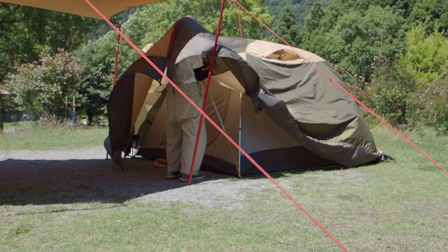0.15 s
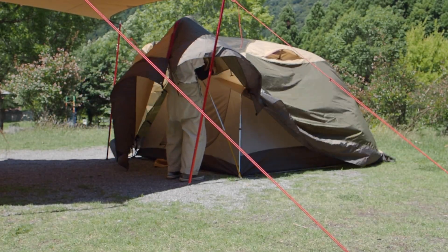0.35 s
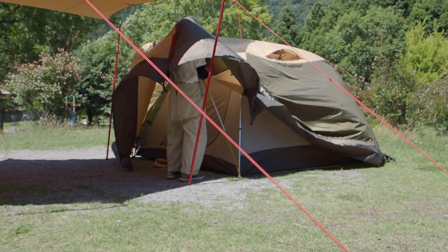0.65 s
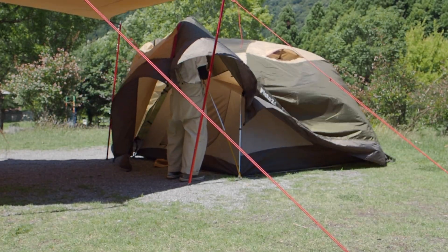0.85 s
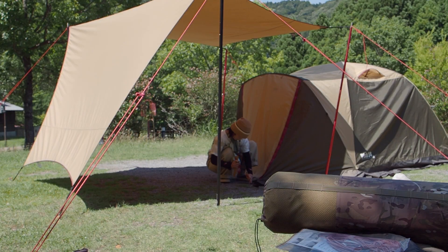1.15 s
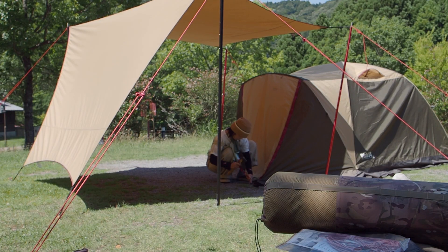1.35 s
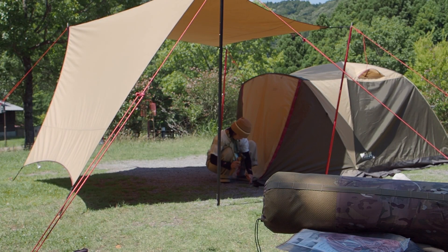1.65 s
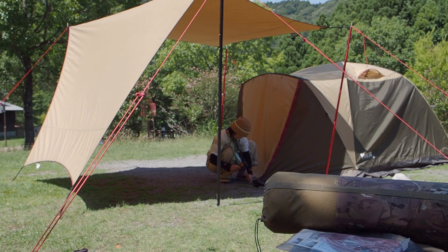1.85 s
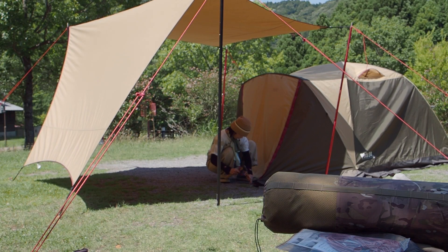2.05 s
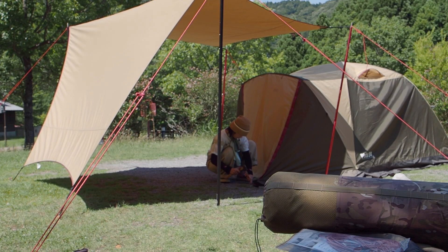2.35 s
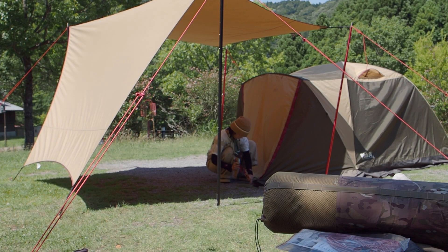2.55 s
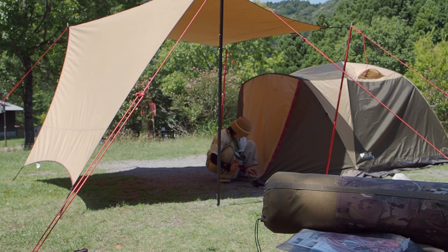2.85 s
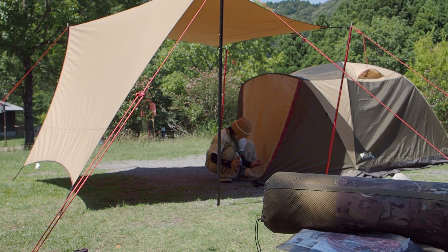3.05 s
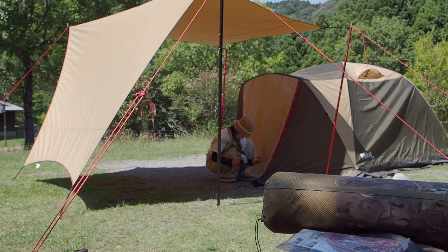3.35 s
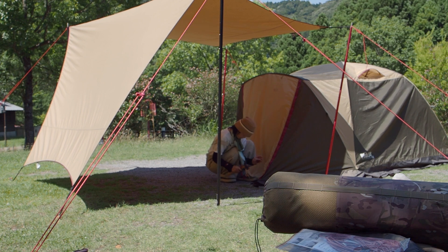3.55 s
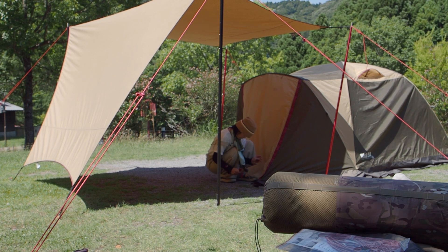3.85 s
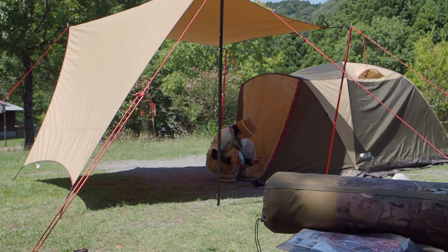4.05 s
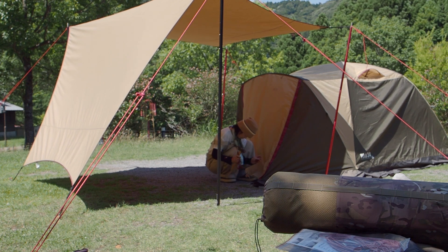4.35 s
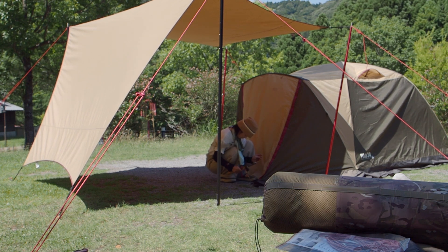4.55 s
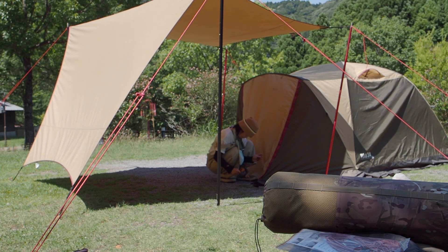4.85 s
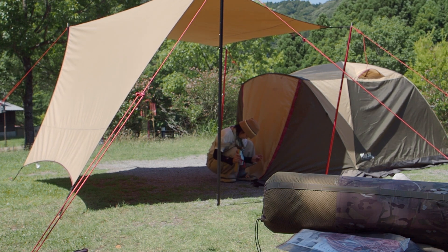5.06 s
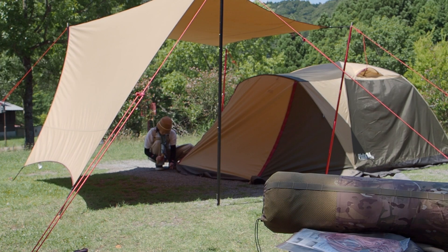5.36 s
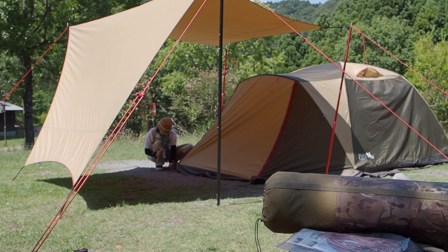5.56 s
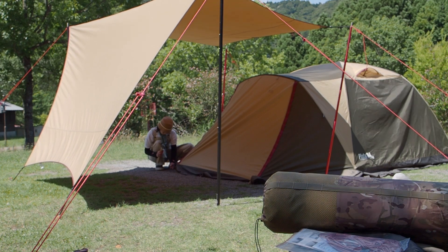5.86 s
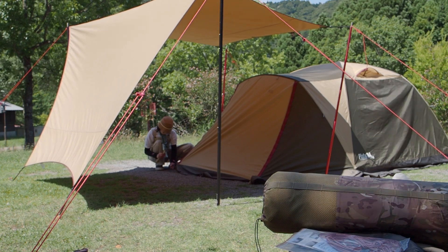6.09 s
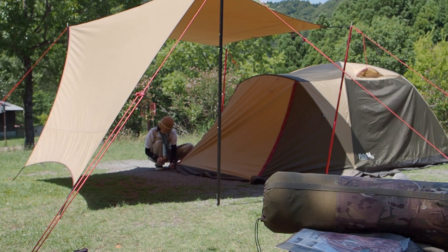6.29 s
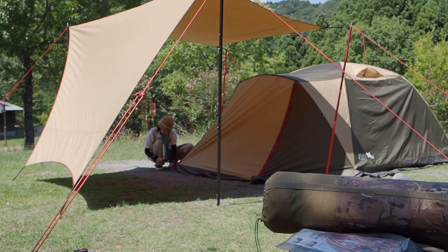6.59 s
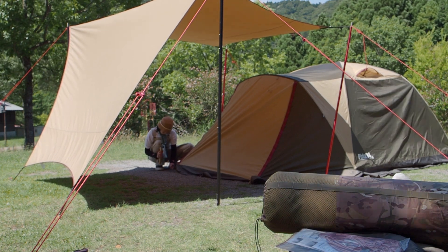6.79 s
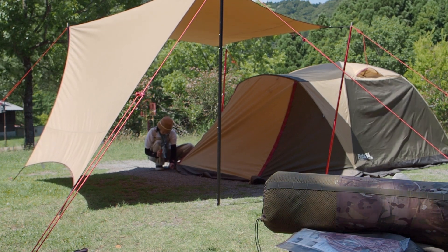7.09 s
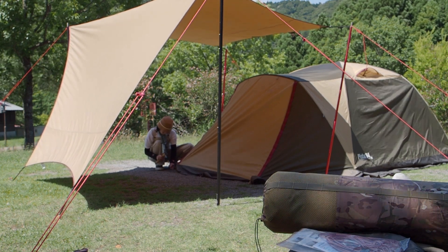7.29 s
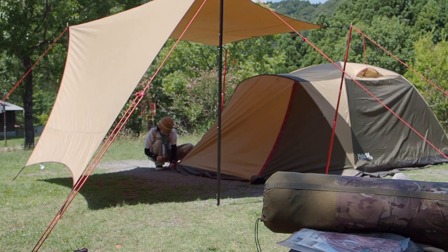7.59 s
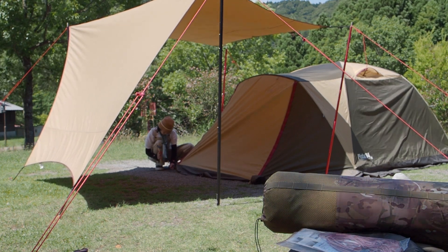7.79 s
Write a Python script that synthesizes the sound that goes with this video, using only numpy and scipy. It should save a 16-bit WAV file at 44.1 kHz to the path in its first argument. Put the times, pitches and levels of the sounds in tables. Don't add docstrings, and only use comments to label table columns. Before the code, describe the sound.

At an open grassy campsite, wind first buffets the microphone over faint leaf hiss. From one second a steel hammer strikes a metal tent peg about every 0.3 seconds, each blow a bright crack with a ringing clang and airy tail. A stiff bag crumples briefly near three seconds. After five seconds a second peg is struck, drier and shorter, with soft wind puffs. Stereo microphone some metres away.

```python
import sys
import numpy as np
from scipy import signal
from scipy.fft import rfft, irfft, next_fast_len
from scipy.io import wavfile
from scipy.ndimage import uniform_filter1d, map_coordinates

SR = 44100
rng = np.random.default_rng(int(sys.argv[2]) if len(sys.argv) > 2 else 0)


def level_to_linear(level):
    exponent = np.asarray(level, float) / 20
    return 10 ** exponent


def log_audio(samples):
    frames = np.atleast_2d(samples).T
    limited = np.clip(frames, -1, 1)
    pcm = np.round(limited * 32767).astype(np.int16)
    wavfile.write(sys.argv[1], SR, pcm)


N = 349713

# (start [s], far hum [dB], leaf hiss [dB], calm buffet [dB])
SHOTS = [
    (0, -49.5, -47, -64),
    (0.954, -52, -54, -64),
    (5.245, -52.5, -47, -72),
]
# (frequency [Hz], likeness [0-1])
ALIKE = [(60, 0.66), (180, 0.56), (550, 0.5), (1650, 0.36), (4970, 0), (15000, 0.05)]


def unit(x):
    return x / np.sqrt(np.mean(x ** 2) + 1e-20)


def along(points, hz):
    f, v = np.transpose(points)
    return np.interp(np.log(hz + 1), np.log(f + 1), v)


def sides(pan_db):
    return np.sqrt(2 / (1 + level_to_linear(np.outer([-1, 1], pan_db)) ** 2))


def add(out, s, sound):
    at = min(round(s * SR), N)
    out[:, at:at + sound.shape[-1]] += sound[..., :N - at]


def wobble(rate_hz):
    knots = rng.standard_normal((2, int(N * rate_hz / SR) + 4))
    return np.array([map_coordinates(k, [np.arange(N) * rate_hz / SR]) for k in knots])


def filtered(x, response):
    m = next_fast_len(x.shape[-1] + 8192)
    spectrum = rfft(x, m) * response(np.fft.rfftfreq(m, 1 / SR))
    return irfft(spectrum, m)[..., :x.shape[-1]]


def pulse(colour, size=1024):
    gain = level_to_linear(along(colour, np.fft.rfftfreq(size, 1 / SR)))
    cepstrum = irfft(np.log(gain + 1e-4))
    cepstrum[1:size // 2] *= 2
    cepstrum[size // 2 + 1:] = 0
    h = irfft(np.exp(rfft(cepstrum)))
    return h / np.abs(h).max()


def wavelet(hz, width_s, phase):
    half = round(4 * width_s * SR)
    t = np.arange(-half, half) / SR
    bell = np.exp(-.5 * (t / width_s) ** 2)
    wave = np.cos(2 * np.pi * hz * t + phase)
    return bell * (wave - np.sum(bell * wave, axis=-1, keepdims=True) / bell.sum())


def modes(table, t, attack_s, spread_db):
    out = np.zeros(len(t))
    for hz, db, t60 in table:
        decay = level_to_linear(db + spread_db * rng.normal() - 60 * t / t60)
        out += decay * np.sin(2 * np.pi * hz * t)
    return out * (1 - np.exp(-t / attack_s))


def rush(colour, alike, patchy_db):
    z = signal.stft(rng.standard_normal((2, N)), nperseg=512)[2]
    field = uniform_filter1d(rng.standard_normal(z.shape[1:]), size=6, axis=0)
    field = uniform_filter1d(field, size=14, axis=1)
    pair = signal.istft(z * level_to_linear(patchy_db * unit(field)), nperseg=512)[1][:, :N]

    def mid_side(hz):
        turn = np.arccos(np.clip(along(alike, hz), -1, 1)) / 2
        return level_to_linear(along(colour, hz)) * [np.cos(turn), np.sin(turn)]

    mid, side = filtered(pair, mid_side)
    return unit(np.array([mid + side, mid - side]))


def background_db():
    start, *levels = np.transpose(SHOTS)
    return np.array(levels)[:, np.searchsorted(start, np.arange(N) / SR, side="right") - 1]


def air():
    # (frequency [Hz], density [dB per Hz])
    hum_colour = [(15, -62), (25, -18), (108, -6.5), (256, -12.5), (286, -9), (399, -6.5), (665, -3.5),
                  (1060, -5), (1650, -6.5), (5000, -13.5), (6500, -38), (11000, -120)]
    # (frequency [Hz], density [dB per Hz])
    leaf_colour = [(880, -59), (1500, -4), (2080, -8.5), (3930, -7.5), (5120, 1.5), (8320, -1.5),
                   (15100, -12), (16100, -28), (16900, -84)]
    # (centre [s], width [s], level [dB])
    stirs = [
        (0.26, 0.041, 3),
        (0.874, 0.01, 0),
        (3.2, 0.16, 2.5),
        (6.05, .4, 1.2),
        (7.62, 0.032, -5.5),
        (7.55, 0.51, -1.5),
        (7.93, 0.062, 1.5),
    ]
    hum_db, hiss_db, _ = background_db()
    t = np.arange(N) / SR
    stir_db = 1.04 * wobble(2.86)[0]
    for s, width_s, db in stirs:
        stir_db += db * np.exp(-.5 * ((t - s) / width_s) ** 2)
    hum_follows = 0.82
    hum = level_to_linear(hum_db + hum_follows * stir_db + 3.5) * rush(hum_colour, ALIKE, patchy_db=1.48)
    return hum + level_to_linear(hiss_db + stir_db + 4.5) * rush(leaf_colour, ALIKE, patchy_db=0.5)


def gust_gain():
    # (start [s], hold [s], buffet [dB], left-right [dB])
    gusts = [(0.296, .24, -50.5, 24), (0.61, .13, -40, 18), (0.69, 0.067, -49, -20),
             (0.816, .13, -41.5, 16), (1.21, 0.057, -59, -6), (1.774, 0.028, -58, 2),
             (2.635, 0.037, -52, -16), (5.68, 0.033, -57, 11), (6.18, 0.017, -55, 12),
             (6.29, 0.027, -58, 3), (6.466, 1.5, -52, 1.5), (6.596, .05, -50.5, 4), (6.8, 0.13, -47, -4),
             (7.058, 0.023, -39.5, -11), (7.137, 0.11, -40.5, -2), (7.463, 0.074, -43, -1),
             (7.809, .13, -40.5, -4)]
    rise_db_per_s, fall_db_per_s, calm_swing_db, veer_db = 500, 203, 3.5, 8
    t = np.arange(N) / SR
    swing, veer = wobble(9)
    power = (level_to_linear(background_db()[2] + calm_swing_db * swing) * sides(veer_db * veer)) ** 2
    for s, hold_s, db, pan_db in gusts:
        before_s = np.clip(s - t, 0, None)
        after_s = np.clip(t - s - hold_s, 0, None)
        shape_db = -rise_db_per_s * before_s - fall_db_per_s * after_s
        same_shot = t < min([change for change, *_ in SHOTS if change > s] + [N])
        power += same_shot * (level_to_linear(db + shape_db) * sides(pan_db)) ** 2
    return np.sqrt(power)


def buffeting():
    # (frequency [Hz], density [dB per Hz])
    colour = [(12, -44), (20, -17), (81, 0), (166, -1.5), (264, -15), (476, -24.5), (558, -38),
              (900, -19.5), (1170, -41), (1980, -120)]
    lumpy = unit(level_to_linear(3.3 * wobble(35)) * rush(colour, [(30, .1)], patchy_db=1))
    return level_to_linear(2.5) * gust_gain() * lumpy


def air_lumps():
    # (time [s], peak [dB], frequency [Hz], left-right [dB])
    lumps = [(0.308, -38.5, 86, 29), (0.52, -39, 111, 19), (0.613, -32, 179, 33), (0.655, -27.5, 109, 26),
             (0.678, -25, 151, 23), (0.711, -33.5, 145, 21.0), (0.727, -34, 197, 24),
             (0.773, -37, 91.5, 12.0), (0.834, -25.5, 178, 30), (0.877, -33, 125, 14),
             (0.924, -38, 125, 14), (6.552, -46, 109, 16), (6.822, -47, 135, 0), (7.021, -48, 108, 10),
             (7.143, -38, 149, 1), (7.173, -36, 128, 6), (7.534, -42, 132, 7), (7.91, -44, 163, 12)]
    parts = [(1, 3, 0.0045), (2.4, -4, 0.0025), (4, -15.5, 0.0015)]  # (ratio, dB, width s)
    out = np.zeros((2, N))
    for s, db, hz, pan_db in lumps:
        phase = 2 * np.pi * rng.random((2, 1))
        for ratio, part_db, width_s in parts:
            burst = wavelet(ratio * hz, width_s, ratio * phase)
            add(out, s + 0.00826 - 4 * width_s, level_to_linear(db + part_db + 2.5) * sides(pan_db) * burst)
    return out


def shank(table, t):
    top_db = max(db for hz, db, t60 in table)
    shift = 1 + 0.0218 * rng.normal()
    shifted = [(hz * shift, db - top_db, t60) for hz, db, t60 in table]
    return modes(shifted, t, attack_s=0.0018, spread_db=4)


def scatter(colour, decay, t):
    hz, frames_s, z = signal.stft(rng.standard_normal((2, len(t))), SR, nperseg=128)
    gain = level_to_linear(along(colour, hz)[:, None] - 60 * frames_s / along(decay, hz)[:, None])
    tail = signal.istft(z * gain, SR, nperseg=128)[1][:, :len(t)]
    return tail / np.sqrt(np.mean(tail[:, :SR // 100] ** 2))


def peg(blows, crack, knock, walls, colour, decay, shank_modes, lag_s, chatter_db, chatter_t60, tail_db,
        thump_db, face_db, clang_t60, typical_knock_db):
    # (frequency [Hz], level [dB], t60 [s])
    face = [(8700, 3.5, 0.0018), (5000, -2.5, 0.0039), (12100, -8, 0.0069), (14850, -2, 0.006)]
    # (frequency [Hz], level [dB], t60 [s])
    head_low = [(3953, -1, .44), (-3986, 0, .16), (-3915, -2, .045), (4040, 5, .03)]
    # (frequency [Hz], level [dB], t60 [s])
    head_high = [(9802, -1, .36), (9786, -3, .2), (9740, 0, .04), (14690, -8, .14)]
    # (delay [s], level [dB], frequency [Hz], width [s])
    soil = [
        (0, 10.5, 490, 0.0005),
        (.0044, 5.5, 192, 0.0014),
        (.018, -6, 170, .002),
    ]
    # (frequency [Hz], density [dB per Hz])
    clang_colour = [(4000, -56), (4550, -13), (4950, 16), (5300, 9), (5900, -50)]
    direct, around = np.zeros((2, N)), np.zeros((2, N))
    t, early = np.arange(SR // 2) / SR, np.arange(SR // 20) / SR
    bright, dull = pulse(crack), pulse(knock)
    typical_db = np.mean(blows, axis=0)[1]
    for s, db, low_db, high_db, clang_db in blows:
        knock_db = typical_knock_db + typical_db - db
        glancing_db = .5 * (knock_db - typical_knock_db)
        chatter = level_to_linear(chatter_db + glancing_db - 60 * early / chatter_t60)
        force = chatter * rng.standard_normal((2, len(early))) + (early == 0)
        thud = signal.fftconvolve(force[1], dull)
        thud *= np.linalg.norm(dull) / np.linalg.norm(thud)
        contact = signal.fftconvolve(force[0], bright) + level_to_linear(knock_db + 1.5) * thud
        contact[:len(early)] += level_to_linear(face_db - glancing_db) * modes(face, early, attack_s=.0001, spread_db=2)
        add(direct, s, level_to_linear(db) * contact[None])

        for delay_s, wall_db, pan_db, hz in walls:
            smear = wavelet(hz * (1 + .04 * rng.normal()), .00018, 0)
            answer = signal.fftconvolve(contact, smear / np.linalg.norm(smear))
            gain = level_to_linear(db + wall_db + 2 * rng.normal()) * sides(pan_db)
            add(direct, s + delay_s - .0009 + 0.00064 * rng.random(), gain * answer)

        ring = level_to_linear(low_db + 5) * modes(head_low, t, .003, 0)
        ring += level_to_linear(high_db + 11) * modes(head_high, t, .003, 0)
        ring += level_to_linear(clang_db - 23.5) * shank(shank_modes, t)
        add(direct, s, level_to_linear(db) * sides(1.4 * rng.normal()) * ring)

        for delay_s, push_db, hz, width_s in soil:
            push = level_to_linear(thump_db + push_db + rng.normal()) * wavelet(hz, width_s, 0)
            add(direct, s + delay_s - 4 * width_s, push[None])

        tail = level_to_linear(tail_db + rng.normal()) * scatter(colour, decay, t)
        tail += level_to_linear(clang_db - 17) * scatter(clang_colour, [(5000, clang_t60)], t)
        add(around, s + 0.00074, level_to_linear(db) * (1 - np.exp(-t / 0.001)) * tail)
    shifted = filtered(direct, lambda f: np.exp(np.pi * 1j * lag_s * np.outer([-1, 1], f)))
    return around + level_to_linear([[-.4], [.4]]) * shifted


def first_peg():
    # (time [s], peak [dB], then against the peak: low ring [dB], high ring [dB], shank clang [dB])
    blows = [(1.0275, -1.5, -45, -69.4, -29), (1.2999, -2, -44, -44.5, -17), (1.5618, -2, -60, -89, -18),
             (1.8343, -3, -79, -72, -17.5), (2.1025, -3.5, -49, -67, -16), (2.3862, -3, -41, -56, -20),
             (2.6593, -5, -45, -47, -19), (2.9473, -5, -38, -48, -19.5), (3.2416, -5, -38, -42, -17),
             (3.5495, -4, -46, -47, -27), (3.8811, -1, -34.5, -41, -28), (4.2199, -1.5, -43.5, -41.5, -28),
             (4.5584, -2, -47, -47, -26), (4.8961, -0.6, -41.5, -56, -51), (5.2317, -1.5, -66, -54, -34)]
    # (frequency [Hz], density [dB per Hz])
    crack = [(1500, -37.5), (2600, -11), (3600, -6.5), (4800, -2), (6300, 5), (8400, -0.5), (10500, 1),
             (13500, -2.5), (15500, 1), (17000, -51)]
    # (frequency [Hz], density [dB per Hz])
    knock = [(300, -49), (600, -6.5), (1000, 0), (1600, 0.5), (2400, -2.5), (3200, -20), (5000, -64)]
    # (delay [s], level [dB], left-right [dB], favoured frequency [Hz])
    walls = [(.0017, -7.5, 5, 4400), (.0052, -16.5, 0, 11600), (.0075, -16.5, -30, 4100),
             (0.0135, -42, 7, 8500), (0.015, -21.5, -4, 8500), (.015, -16.5, -8, 4560),
             (0.022, -23.5, 3, 8800)]
    # (frequency [Hz], density [dB per Hz])
    colour = [(180, -46), (300, 8), (746, -61), (1180, 7.5), (3190, -1.5), (3900, 3.5), (6470, 1.5),
              (8620, 6), (15800, -1.5), (16900, -65)]
    # (frequency [Hz], t60 [s])
    decay = [(500, 0.087), (2000, 0.12), (5000, 0.44), (9000, 0.33), (15000, 0.3)]
    # (frequency [Hz], level [dB], t60 [s])
    shank_modes = [(4660, -5, 0.26), (4990, 3, .15), (5250, -3, .2)]
    return peg(blows, crack, knock, walls, colour, decay, shank_modes, lag_s=29e-6,
               chatter_db=-18.5, chatter_t60=0.017, tail_db=-29.5, thump_db=-35.0, face_db=-5.5,
               clang_t60=0.34, typical_knock_db=-13)


def bag():
    # (time [s], peak [dB], frequency [Hz])
    creases = [(3.072, -28.5, 1190), (3.113, -30.5, 1470), (3.141, -32.5, 1050), (3.153, -25.5, 1550),
               (3.167, -26, 1600), (3.177, -29, 1820), (3.195, -29, 1540), (3.21, -30, 1840),
               (3.222, -28, 1570), (3.232, -31, 1460), (4.8, -40, 1650)]
    grains_db, grains_t60 = -9, .14
    snap_parts = [(1, 0, .011), (1.35, -3, .008), (.7, -6, .009), (2.2, -7, .005), (3.6, -13, .003)]
    t, now = np.arange(SR // 30) / SR, np.arange(N) / SR
    power = np.zeros(N)
    for s, db, hz in creases:
        power += (now > s) * level_to_linear(db + grains_db - 60 * abs(now - s) / grains_t60) ** 2
    grains = rng.standard_normal(N) * level_to_linear(3 * wobble(400)[0])

    def body(f):
        return 1j * f * 1300 / (1500 ** 2 - f * f + 1j * f * 1300)

    out = np.zeros((2, N))
    out += np.sqrt(power) * unit(filtered(filtered(grains, body), body))
    for s, db, hz in creases:
        table = [(ratio * hz, part_db, t60) for ratio, part_db, t60 in snap_parts]
        add(out, s, level_to_linear(db + 6) * modes(table, t, attack_s=.0004, spread_db=1)[None])
    return out


def breeze():
    # (level [dB], sag [dB/s], end [s], fade [dB/s])
    course = (-56, 4.5, 6.3, 43)
    # (frequency [Hz], density [dB per Hz])
    colour = [(70, -40), (130, -8.5), (200, -4.5), (250, -7), (300, -30), (400, -83)]
    level_db, sag_db_per_s, end_s, fade_db_per_s = course
    t, start_s = np.arange(N) / SR, SHOTS[-1][0]
    gain_db = level_db - sag_db_per_s * (t - start_s) - fade_db_per_s * np.clip(t - end_s, 0, None)
    return (t > start_s) * level_to_linear(gain_db) * rush(colour, [(30, 0.93)], patchy_db=3.0)


def second_peg():
    # (time [s], peak [dB], then against the peak: low ring [dB], high ring [dB], shank clang [dB])
    blows = [(5.4283, -2, -54, -54, -16), (5.737, 1.5, -69, -53, -19), (6.0426, -0.1, -72.2, -52, -8),
             (6.3387, -0.5, -69.7, -61, -12.5), (6.6435, 1, -65.5, -74, -30), (6.9453, 2, -72.1, -70, -18),
             (7.2577, 0.6, -69.5, -62, -7.5), (7.5724, 1.5, -68, -54, -17), (7.9043, 1, -59, -64.5, -15)]
    # (frequency [Hz], density [dB per Hz])
    crack = [(1500, -52), (2600, -1.5), (3600, -5.5), (4800, 0), (6300, -5.5), (8400, 5), (10500, 2.5),
             (13000, -6), (15500, -11.5), (17000, -20.5)]
    # (frequency [Hz], density [dB per Hz])
    knock = [(300, -75), (600, 7.5), (1000, 7), (1600, 9), (2400, 18.5), (3200, -2.5), (5000, -122)]
    # (delay [s], level [dB], left-right [dB], favoured frequency [Hz])
    walls = [(.0045, -7, 4, 5460), (.0095, -19.5, 17, 8700), (.011, -20, -14, 5000),
             (0.021, -23.5, -19, 4720), (0.021, -24.5, -23, 9000), (.029, -32.5, -3, 8750)]
    # (frequency [Hz], density [dB per Hz])
    colour = [(180, -51), (300, -3), (1620, -2.5), (1830, 0), (3770, -5), (5020, -27), (6360, -8),
              (9540, -9), (15300, -11), (16900, -49)]
    # (frequency [Hz], t60 [s])
    decay = [(500, 0.046), (2000, 0.085), (5000, 0.16), (9000, 0.39), (15000, 0.16)]
    # (frequency [Hz], level [dB], t60 [s])
    shank_modes = [(4721, -16, 0.3), (5120, -1, 0.14), (5180, -4.5, 0.16)]
    return peg(blows, crack, knock, walls, colour, decay, shank_modes, lag_s=3e-6,
               chatter_db=-20.0, chatter_t60=0.011, tail_db=-37.5, thump_db=-45.5, face_db=-13.5,
               clang_t60=0.1, typical_knock_db=-18.5)


def scene():
    wind = buffeting() + air_lumps() + breeze()
    return air() + wind + first_peg() + bag() + second_peg()


def low_pass(x):
    return signal.sosfilt(signal.butter(12, 17080, fs=SR, output="sos"), x)


def record(dry):
    # (frequency [Hz], width [Hz], level [dB])
    casing = [(273.3, 55, -5), (575, 81, -13.5), (6350, 1930, -6.5), (8250, 1530, 3.5)]

    def response(f):
        gain = 1 / (1 + (f / 16300) ** 60)
        for hz, width_hz, db in casing:
            rest = hz * hz - f * f
            gain = gain * (rest + 1j * f * width_hz * level_to_linear(db)) / (rest + 1j * f * width_hz)
        return gain

    mix = np.clip(filtered(dry, response) - 3e-4, -1, 1)
    return low_pass(mix)


dry = scene()
out = record(dry)
log_audio(out)
```